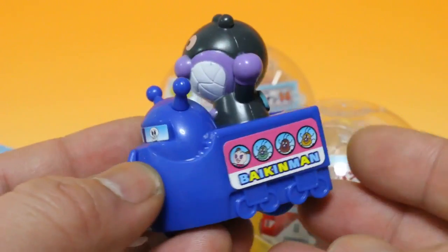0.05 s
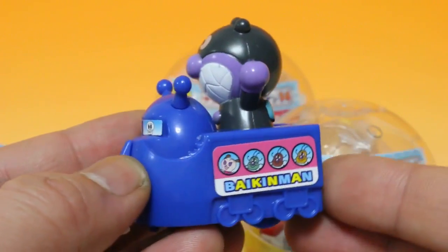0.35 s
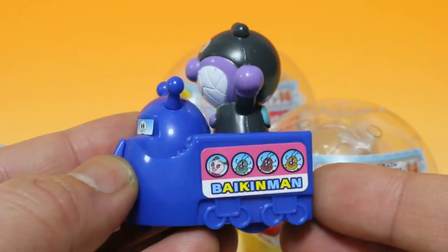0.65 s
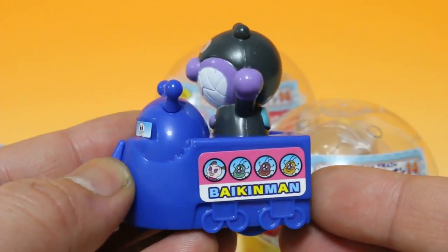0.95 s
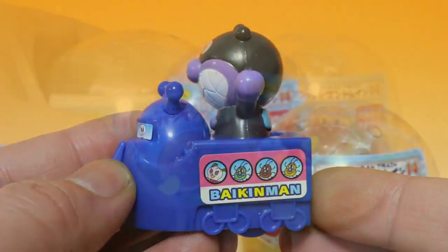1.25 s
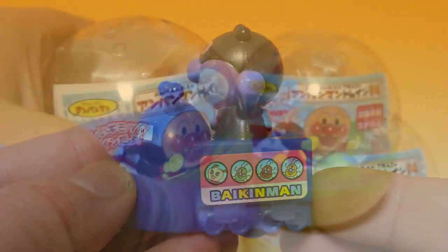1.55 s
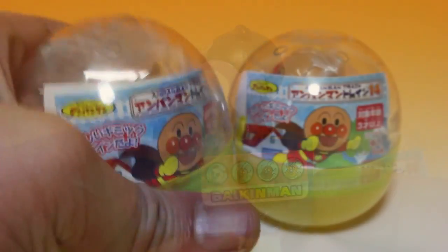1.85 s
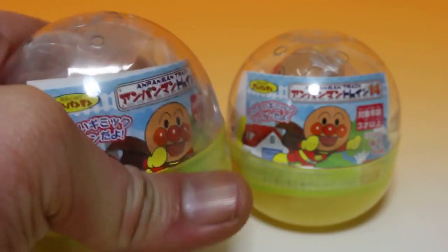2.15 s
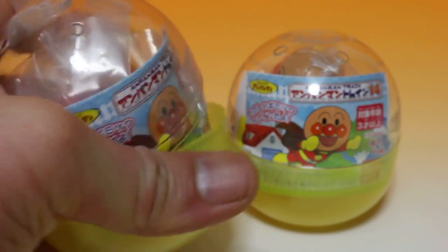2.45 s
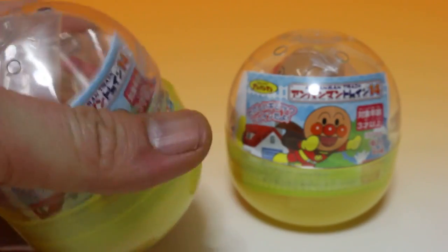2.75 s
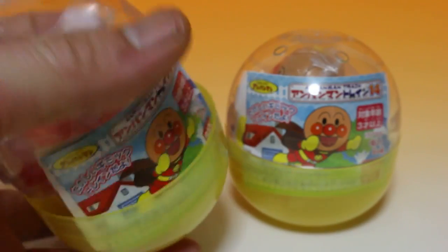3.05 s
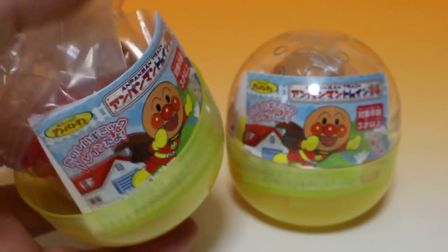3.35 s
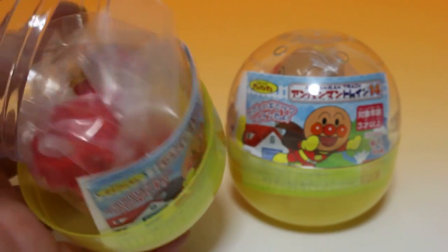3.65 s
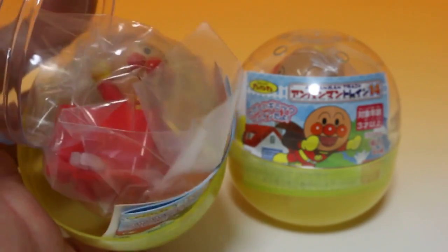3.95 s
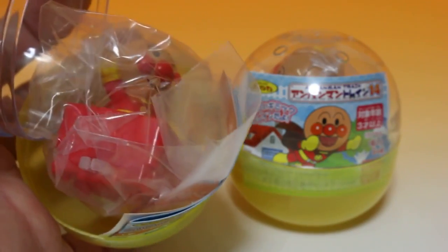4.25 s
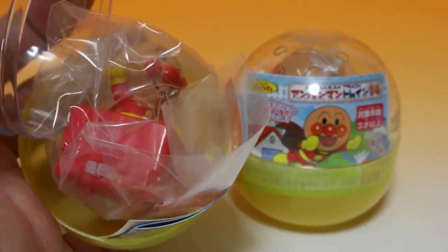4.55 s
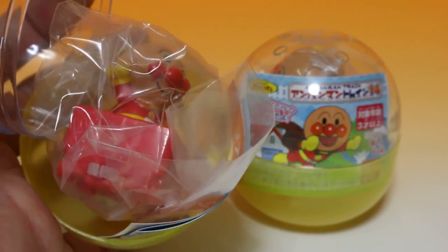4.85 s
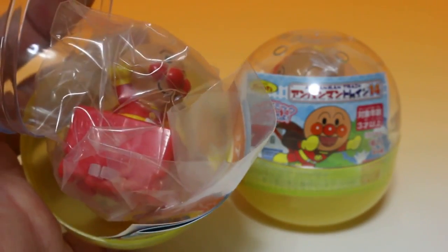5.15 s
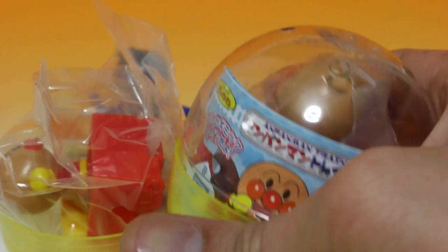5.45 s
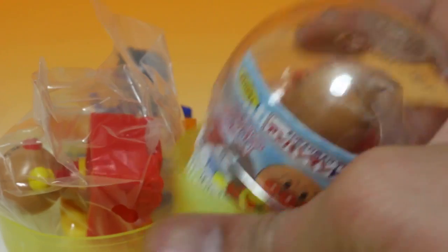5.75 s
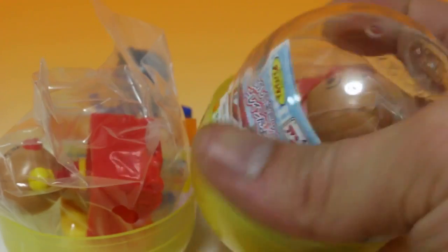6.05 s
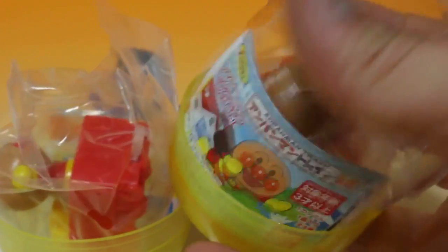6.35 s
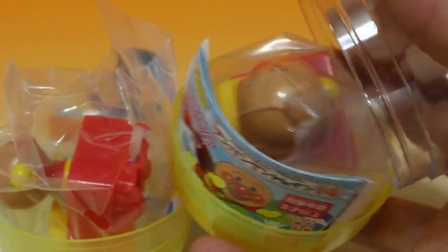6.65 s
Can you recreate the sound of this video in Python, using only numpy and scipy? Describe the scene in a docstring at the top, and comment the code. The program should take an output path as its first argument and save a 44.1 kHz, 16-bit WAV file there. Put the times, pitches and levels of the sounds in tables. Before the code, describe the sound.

Close to the microphone in a small room, two hollow plastic capsules are opened by hand, one after the other. Each lid rasps briefly over its catch and lets go with a loud, cracking pop and a short echo. After each opening the halves tick and knock lightly, fingers rub the shell and the toy's wrapper crinkles softly. Only low room noise fills the start and the pause between the capsules.

```python
"""Two plastic toy capsules snap open, squeezed by hand above a table in a small room, close to the microphone.
Each lid rasps over its catch and jumps it: the wall springs back, the air inside pops, shell and rim ring.
The halves knock and tick, fingers rub, the wrapped toy rustles and jostles; the hollow cup rings on.
Low room noise lies underneath. A limiter ducks on the snaps and lets the room's echo swell back."""
import sys
import numpy as np
from scipy import signal
from scipy.fft import rfft, irfft
from scipy.io import wavfile
from scipy.ndimage import uniform_filter1d, minimum_filter1d

SR = 44100
rng = np.random.default_rng(int(sys.argv[2]) if len(sys.argv) > 2 else 0)


def wav_out(sig):
    """Save sig, one row per channel (or a flat mono array), as 16-bit PCM at SR to the path in sys.argv[1]."""
    wavfile.write(sys.argv[1], SR, np.round(np.clip(np.atleast_2d(sig).T, -1, 1) * 32767).astype(np.int16))


N = 299394
TIME_S = np.arange(N) / SR
BLOW_S = np.arange(2048) / SR

# room noise spectrum: freq_hz, density_db
AMBIENCE_SPECTRUM = [(12, -40), (20, -7.5), (53, -11.5), (87, -0.5), (144, -9.5), (180, -7), (324, -12.5),
                     (416, -16.5), (465, -15.5), (565, -15.5), (614, -16.5), (857, -14.5), (1200, -19.5),
                     (6720, -26.5), (15500, -33)]
# left-right likeness of the room noise: freq_hz, correlation
AMBIENCE_CORRELATION = [(30, 1), (200, 0.87), (600, 0.4), (1500, 0.16), (4000, 0.096), (12000, 0.15)]
# left-right likeness of echoes and friction: freq_hz, correlation
ROOM_CORRELATION = [(300, 0.98), (900, 0.89), (2500, 0.71), (5000, 0.021), (10000, 0)]
# room echo: freq_hz, energy_re_input_db, t60_s
ROOM_DECAY = [(150, -11.5, 0.31), (400, -14, 0.19), (749, -12, 0.31), (1156, -3, 0.24), (2200, -5, 0.26),
              (5073, -6.5, 0.29), (8490, -5.5, 0.24), (14940, -8, 0.26)]
# stereo tilt, duller on the left: freq_hz, left_minus_right_db
BALANCE = [(100, -0.5), (600, 1.5), (1200, -1), (3500, -2.5), (8000, -3), (14000, -2.5)]

# hollow cup modes: freq_hz, gain_db, t60_s
CUP_MODES = [(275, -11.5, .22), (562, -13.5, .22), (745, -12, .2), (983, -2, .26), (1108, 0, .3)]
# thin shell bending modes: freq_hz, relative_db, t60_s
SHELL_MODES = [(1450, 0.5, 0.0053), (1740, -1, 0.0083), (2386, -2, 0.0066), (2857, -3.5, 0.0061),
               (3176, 0.5, 0.0049), (3926, -11, 0.014), (4440, -5.5, 0.0063), (5320, -6, .006),
               (6120, -6, .006)]
# stiff rim modes: freq_hz, relative_db, t60_s
RIM_MODES = [(6730, -6, 0.0073), (7700, 1, 0.0057), (8100, -0.5, 0.0079), (9230, -11.5, 0.0038),
             (9180, -0.5, 0.0091), (10170, -4, .006), (11070, -5, 0.0061), (12750, -8, 0.0058),
             (15700, -8.5, .004)]
# fingers on the shell: freq_hz, density_db
RUB_SPECTRUM = [(100, -9.5), (250, -4), (500, 0), (900, -2), (1300, -5), (2200, -16), (5000, -33.5)]
# wrapper: freq_hz, density_db
CRINKLE_SPECTRUM = [(700, -25.5), (1600, -0.5), (3200, 0.5), (5500, -2.5), (9000, -7.5), (15000, -17.5)]
# rim on the catch: freq_hz, density_db
RASP_SPECTRUM = [(250, -7), (800, 3), (2100, -2), (4100, -1.5), (5800, -8), (7800, -1), (10200, -0.5),
                 (12000, -5.5), (15500, -12.5)]

# hands hold and turn a capsule: start_s, length_s, rub_db, crinkle_db
HOLDS = [(1.947, .6, -66.5, -71), (2.6, 1.22, -59.5, -65), (5.66, 1, -57.5, -68)]
# finger or wrapper slides: peak_s, rub_db, crinkle_db
SLIDES = [(2.02, -70, -62), (2.66, -57.5, -62), (3.01, -54.5, -60), (3.148, -49, -54.5), (3.31, -55.5, -68),
          (3.545, -52, -54), (3.8, -44.5, -69), (6.06, -55, -58), (6.27, -60, -58.5), (6.409, -50.5, -63),
          (6.52, -56, -58)]
# shell and toy knocks: start_s, level_db, pitch_hz, crack_relative_db
KNOCKS = [ (1.651, -43.5, 507, -22), (2.008, -41, 3200, -24.5), (2.3115, -35, 2370, -12),
          (2.545, -35, 520, -5), (2.670, -37.5, 2140, -8), (2.7740, -8, 917, -2), (3.2204, -42, 905, -8),
          (3.2789, -35.5, 1720, -15), (3.664, -34, 706, 1.5), (3.668, -33.5, 1220, -13),
          (3.672, -37.5, 610, -8), (3.740, -37.5, 790, -3), (3.750, -36, 856, 7.5), (3.7817, -40.5, 750, 8),
          (3.792, -36, 780, 4), (5.978, -43, 696, -10), (6.106, -40, 915, -10), (6.252, -34.5, 870, 2.5),
          (6.320, -40.5, 900, 3), (6.526, -37.5, 860, 8), (6.6200, -33.5, 850, 3),
          (6.6357, -24.5, 1150, -12), (6.6440, -31.5, 1350, -14), (6.6480, -28, 1220, -5),
          (6.6483, -34.5, 520, -12), (6.6572, -34, 1150, -8), ]
# rim and wrapper ticks: start_s, pop_db, crack_db, rim_db
TICKS = [ (2.008, -58, -56, -39), (2.635, -42, -39.5, -43.5), (2.7737, -40, -24, -55.5),
         (2.850, -31.5, -34, -38.5), (3.279, -39, -34.5, -52), (3.298, -41.5, -41, -42.5),
         (3.5247, -42, -28.5, -36), (3.534, -44, -47, -40), (3.747, -37.5, -39, -55),
         (3.8129, -40, -22.5, -25), (3.8250, -34, -26, -36), (3.8341, -37, -28.5, -34.5),
         (5.978, -36.5, -32, -61), (6.052, -38, -33.5, -36.5), (6.385, -46, -29.5, -36),
         (6.4682, -37.5, -27, -40), (6.636, -28, -32, -43.5), (6.7443, -46, -38, -58), ]
# rim drags over the catch: full_force_s, hold_s, level_db
DRAGS = [(2.414, 0.0089, -10), (5.769, 0.0023, -7.5)]
# lid jumps the catch: start_s, thump_db, pop_db, pop_hz, swell_s, crack_db, rim_db, lip_hz, room_send_db
SNAPS = [ (2.3196, -23, -24, 690, 0.00092, -19, -38.5, 7700, 4),
         (2.3216, -7, 4.5, 710, 0.00043, -3.5, -13.5, 8100, 1.5),
         (2.386, -21, -5, 740, .00098, -14.5, -23, 8400, -1),
         (2.4013, -15, -13.5, 708, .0015, -40, -45, 7600, -4),
         (2.4079, -3.5, 7, 790, 0.00077, -2.5, -15, 9350, 2.5),
         (2.4123, 3, -0.5, 541.5, 0.0012, 2, 14, 7380, -2.5),
         (2.4154, -7, -2.5, 1020, .00078, 6, 0, 8250, 6),
         (5.727, -7.5, -6.5, 665, 0.0015, -15.5, -31, 9300, 6),
         (5.7279, -6.5, -28.5, 699, .0013, -4.5, -4, 8700, -2.5),
         (5.7679, -11, -2, 800, 0.00049, 3, 9.5, 8050, -3.5),
         (5.7700, -10, -5.5, 690, 0.001, 5, 9, 9530, 0), (5.7717, -6, 1, 860, 0.00059, 3, -6, 10500, 5), ]


def from_db(db):
    return 10 ** (np.asarray(db) / 20)


def unit_rms(x):
    return x / np.sqrt(np.mean(x ** 2) + 1e-20)


def at_hz(points, hz, column=1):
    """Table column interpolated over log frequency."""
    table = np.array(points)
    return np.interp(np.log(np.maximum(hz, 1)), np.log(table[:, 0]), table[:, column])


def colour(x, spectrum):
    """Spectral shaping to rms 1."""
    return unit_rms(irfft(rfft(x) * from_db(at_hz(spectrum, np.fft.rfftfreq(N, 1 / SR))), N))


def spread(pair, correlation):
    """Two unrelated signals mixed to stereo: alike in the bass, apart in the treble."""
    size = pair.shape[1]
    alike = np.clip(at_hz(correlation, np.fft.rfftfreq(size, 1 / SR)), -1, 1)
    mid, side = rfft(pair)
    return irfft(np.sqrt(1 + alike) * mid + np.sqrt(1 - alike) * side * [[1], [-1]], size)


def add(track, start_s, sound):
    start = round(start_s * SR)
    track[:, start:start + sound.shape[-1]] += sound[..., :N - start]


def envelope(full_s, hold_s, rise_db_per_s, fall_db_per_s):
    """Rise and fall linear in dB; gain 1 during the hold."""
    rise_db = np.maximum(full_s - TIME_S, 0) * rise_db_per_s
    fall_db = np.maximum(TIME_S - full_s - hold_s, 0) * fall_db_per_s
    return from_db(-np.minimum(rise_db + fall_db, 200))


def ambience(level_db=-54.5, dip_at_s=1.515, dip_db=-2.4, dip_half_width_s=0.22):
    """Low room noise and faint hiss; the level dips once."""
    dip = np.exp(-((TIME_S - dip_at_s) / dip_half_width_s) ** 2)
    noise = spread(rng.standard_normal((2, N)), AMBIENCE_CORRELATION)
    return from_db(level_db + dip_db * dip) * colour(noise, AMBIENCE_SPECTRUM)


def room(x, full_at_s=0.0032, build_up_s=0.0026):
    """Dense echoes build up within milliseconds and die band by band."""
    t = TIME_S[:SR // 2]
    hz = np.fft.rfftfreq(len(t), 1 / SR)
    noise = rfft(unit_rms(spread(rng.standard_normal((2, len(t))), ROOM_CORRELATION)))
    onset = np.clip((t - full_at_s) / build_up_s + 1, 0, 1)
    edges_hz = np.geomspace(100, 17000, 16)
    response = 0
    for low, high in zip(edges_hz, edges_hz[1:]):
        centre_hz = np.sqrt(low * high)
        band = irfft(noise * ((hz >= low) & (hz < high)), len(t))
        decay = from_db(-60 * t / at_hz(ROOM_DECAY, centre_hz, column=2))
        gain = from_db(at_hz(ROOM_DECAY, centre_hz)) * np.sqrt(2 * (high - low) / SR / len(t))
        response = response + gain * unit_rms(band * onset * decay)
    return signal.fftconvolve(x, response, axes=1)[:, :N]


def room_echo(small_sounds, paths=3, send_db=2.5):
    """The shell radiates differently in each direction; the paths sum to an even tail."""
    echoes = [room(snaps(to_room=True) + from_db(send_db) * (small_sounds + ticks()))
              for _ in range(paths)]
    return sum(echoes) / np.sqrt(paths)


def backdrop_echo(x, delay_s=0.0078, t60_s=0.022, level_db=-15):
    """One smeared reflection from behind the table."""
    noise = spread(rng.standard_normal((2, len(BLOW_S))), ROOM_CORRELATION)
    cluster = noise * (BLOW_S > delay_s) * from_db(-60 * BLOW_S / t60_s)
    cluster /= np.sqrt(np.sum(cluster ** 2) / 2)
    return from_db(level_db) * signal.fftconvolve(x, cluster, axes=1)[:, :N]


def cup_ring(x):
    """The hollow cup rings on after each blow."""
    out, drive = 0, x.mean(axis=0) + 1e-18
    for hz, gain_db, t60_s in CUP_MODES:
        radius = from_db(-60 / (t60_s * SR))
        b = (1 - radius ** 2) / 2 * np.array([1, 0, -1])
        a = [1, -2 * radius * np.cos(2 * np.pi * hz / SR), radius ** 2]
        out = out + from_db(gain_db) * signal.lfilter(b, a, drive)
    return out


def friction(spectrum, slips_per_s, unevenness_db):
    """Tiny random slips of uneven size; rms 1."""
    sizes = from_db(unevenness_db * np.minimum(rng.exponential(1, (2, N)), 4))
    signs = rng.choice([-1, 1], (2, N))
    slipping = rng.random((2, N)) < slips_per_s / SR
    return colour(spread(sizes * signs * slipping, ROOM_CORRELATION), spectrum)


def handling():
    """Fingers rub the shell, the wrapper crinkles: soft in a hold, swelling with each slide."""
    moves = [(envelope(start_s, length_s, rise_db_per_s=59.5, fall_db_per_s=66), levels_db)
             for start_s, length_s, *levels_db in HOLDS]
    moves += [(envelope(peak_s, 0, rise_db_per_s=260, fall_db_per_s=227), levels_db)
              for peak_s, *levels_db in SLIDES]
    powers = sum(np.outer(from_db(levels_db), shape) ** 2 for shape, levels_db in moves)
    rub_gain, crinkle_gain = np.sqrt(powers)
    rub = friction(RUB_SPECTRUM, slips_per_s=1500, unevenness_db=3)
    crinkle = friction(CRINKLE_SPECTRUM, slips_per_s=700, unevenness_db=2.5)
    return rub_gain * rub + crinkle_gain * crinkle


def pop(hz, swell_s, t=BLOW_S):
    """Heavily damped resonance; its envelope peaks at swell_s."""
    age = t / swell_s
    return age * np.exp(1 - age) * np.sin(2 * np.pi * hz * t)


def strike(modes, scatter_rad, grit, contact_s=0.00027, detune=0.034):
    """Struck modes plus stick-slip grit; the grip detunes them, each side hears its own phase."""
    hz, level_db, t60_s = np.transpose(modes)[:, :, None]
    hz = hz * (1 + detune * rng.standard_normal(hz.shape))
    gain = from_db(level_db + 2 * rng.standard_normal(hz.shape))
    phase = 2 * np.pi * rng.random(hz.shape) + scatter_rad * rng.standard_normal((2, len(hz), 1))
    decay = from_db(-60 * BLOW_S / t60_s)
    rings = np.sum(gain * decay * np.sin(2 * np.pi * hz * BLOW_S + phase), axis=1)
    band = signal.butter(1, [hz.min(), min(hz.max(), 16000)], "band", fs=SR, output="sos")
    burst = rng.standard_normal((2, len(BLOW_S))) * from_db(-60 * BLOW_S / t60_s.mean())
    slips = signal.sosfilt(band, burst)
    force = 1 - np.exp(-BLOW_S / contact_s)   # the plastic yields
    sound = signal.sosfilt(band, force * (unit_rms(rings) + grit * unit_rms(slips)))
    return sound / np.sqrt(np.sum(sound ** 2, axis=1, keepdims=True) / 10)   # peak near 1


def shell_crack():
    """The thin shell flexes: a gritty crack."""
    return strike(SHELL_MODES, scatter_rad=0.15, grit=0.77)


def rim_ring():
    """The stiff rim rings: bright and wide."""
    return strike(RIM_MODES, scatter_rad=0.85, grit=0.29)


def knock(hz, crack_db, swell_cycles=0.85, blunt_hz=2300, rim_db=-26):
    """A blunt contact rings one resonance of cup or toy, the low shell modes and a trace of rim."""
    lowpass = signal.butter(3, blunt_hz, fs=SR, output="sos")
    edge = signal.sosfilt(lowpass, shell_crack()) + from_db(rim_db) * rim_ring()
    return pop(hz, swell_cycles / hz) + from_db(crack_db) * edge


def jostles(per_s=12, above_rub_db=7, uneven_db=3, centre_hz=850, spread_octaves=0.5):
    """The loose toy knocks faintly at random during each hold."""
    out = np.zeros((2, N))
    for start_s, length_s, rub_db, _ in HOLDS:
        for when, size, pitch in rng.random((round(per_s * length_s), 3)):
            hz = centre_hz * 2 ** (spread_octaves * (2 * pitch - 1))
            level_db = rub_db + above_rub_db + uneven_db * (2 * size - 1)
            add(out, start_s + when * length_s, from_db(level_db) * knock(hz, crack_db=-2))
    return out


def knocks():
    """The halves and the toy bump together."""
    out = np.zeros((2, N))
    for start_s, level_db, hz, crack_db in KNOCKS:
        add(out, start_s, from_db(level_db) * knock(hz, crack_db))
    return out


def ticks(air_hz=950, swell_s=0.00089):
    """Sharp contacts ring the plastic over a small air pop."""
    out = np.zeros((2, N))
    for start_s, pop_db, crack_db, rim_db in TICKS:
        air = from_db(pop_db) * pop(air_hz, swell_s)
        add(out, start_s, air + from_db(crack_db) * shell_crack() + from_db(rim_db) * rim_ring())
    return out


def rasp():
    """The rim sticks and slips as it rides over the catch."""
    force = sum(from_db(level_db) * envelope(full_s, hold_s, rise_db_per_s=3300, fall_db_per_s=3200)
                for full_s, hold_s, level_db in DRAGS)
    return force * friction(RASP_SPECTRUM, slips_per_s=8100, unevenness_db=1)


def lip_ping(hz, swell_s=0.00037, left_lag_s=0.00002):
    """The freed lip of the lid pings, reaching the left side later."""
    age_s = np.maximum(BLOW_S - np.array([[left_lag_s], [0]]), 0)
    return pop(hz, swell_s, age_s)


def snaps(to_room=False, wall_hz=365, wall_swell_s=0.0011, lip_db=-3.5):
    """The lid jumps its catch: the wall springs back, enclosed air pops, shell, rim and lip ring."""
    out = np.zeros((2, N))
    for start_s, thump_db, pop_db, pop_hz, swell_s, crack_db, rim_db, lip_hz, room_send_db in SNAPS:
        thump = from_db(thump_db) * pop(wall_hz, wall_swell_s)
        air = from_db(pop_db) * pop(pop_hz, swell_s)
        crack = from_db(crack_db) * shell_crack()
        rim = from_db(rim_db) * (rim_ring() + from_db(lip_db) * lip_ping(lip_hz))
        add(out, start_s, (thump + air + crack + rim) * from_db(room_send_db if to_room else 0))
    return out


def scene(low_cut_hz=195):
    """Capsules, echoes and room noise; so small a body radiates little bass."""
    small_sounds = knocks() + handling() + rasp() + jostles()
    direct = snaps() + ticks() + small_sounds
    heard = direct + cup_ring(direct) + backdrop_echo(direct) + room_echo(small_sounds)
    capsules = signal.sosfilt(signal.butter(4, low_cut_hz, "high", fs=SR, output="sos"), heard)
    tilt_db = at_hz(BALANCE, np.fft.rfftfreq(N, 1 / SR)) * [[0.5], [-0.5]]
    return irfft(rfft(capsules) * from_db(tilt_db), N) + ambience()


def record(dry, ceiling_db=0.5, release_db_per_s=105, cutoff_hz=15800):
    """Limiter with sub-millisecond attack and steady release, then clipping and a steep low-pass."""
    over_db = np.maximum(20 * np.log10(np.abs(dry).max(axis=0) + 1e-9) - ceiling_db, 0)
    recovery_db = release_db_per_s * TIME_S
    duck_db = np.maximum.accumulate(over_db + recovery_db) - recovery_db
    gain_db = uniform_filter1d(minimum_filter1d(-duck_db, size=24), size=36)
    limited = np.clip(dry * from_db(gain_db), -1, 1)
    return signal.sosfilt(signal.ellip(10, 0.1, 70, cutoff_hz, fs=SR, output="sos"), limited)


dry = scene()
out = record(dry)
wav_out(out)
```